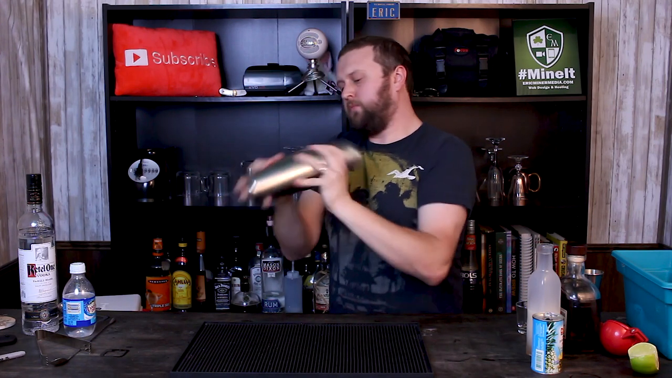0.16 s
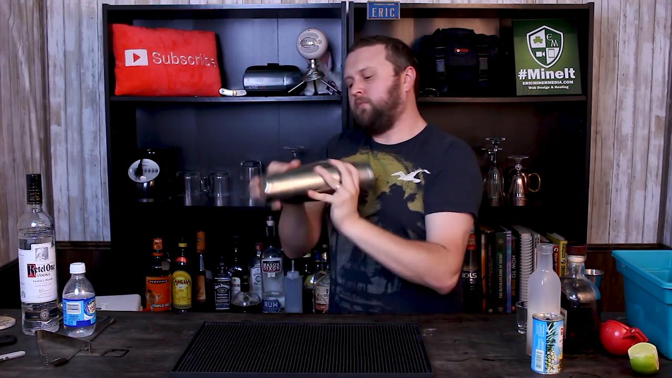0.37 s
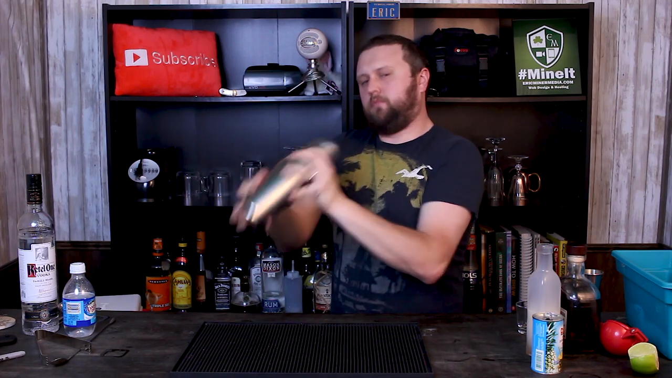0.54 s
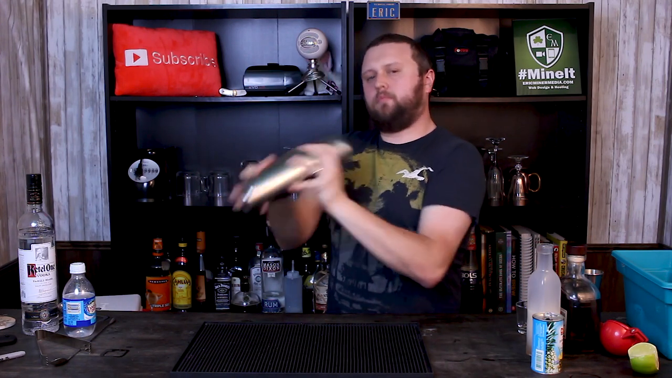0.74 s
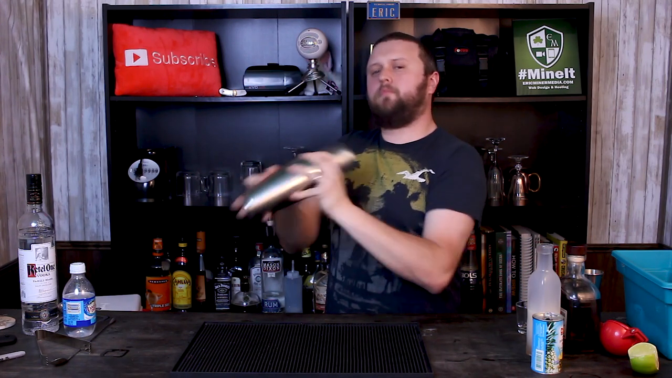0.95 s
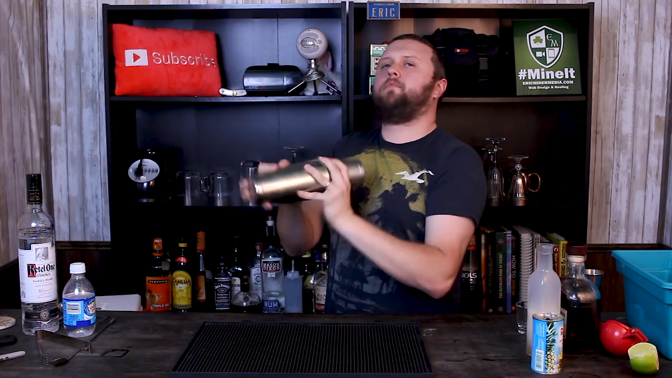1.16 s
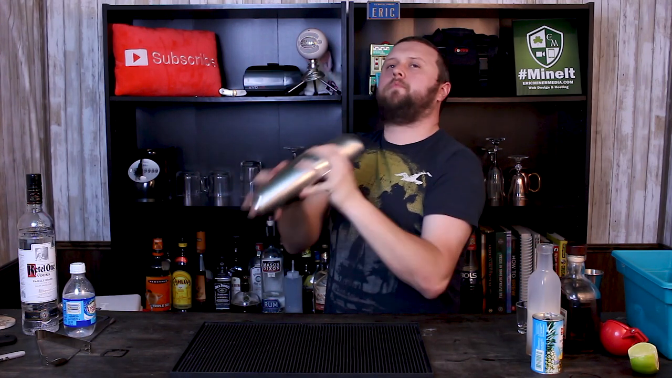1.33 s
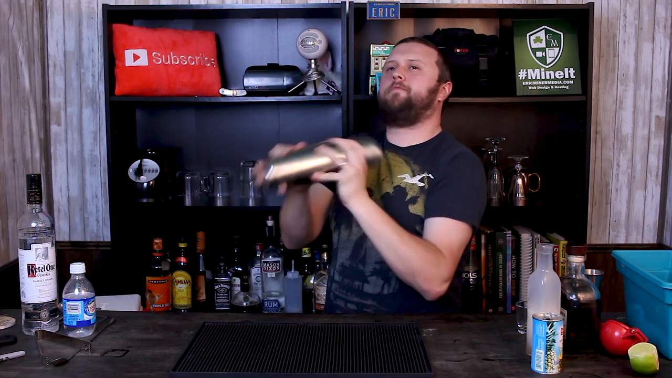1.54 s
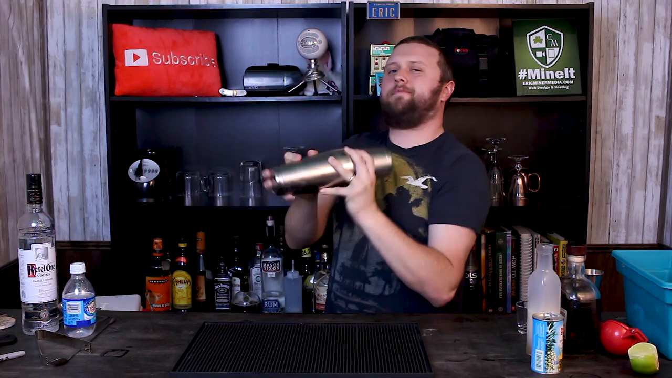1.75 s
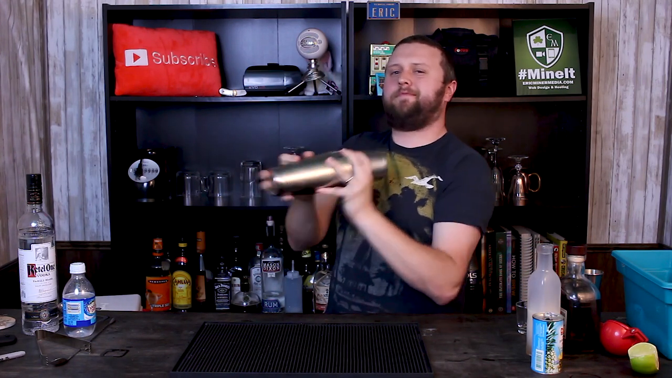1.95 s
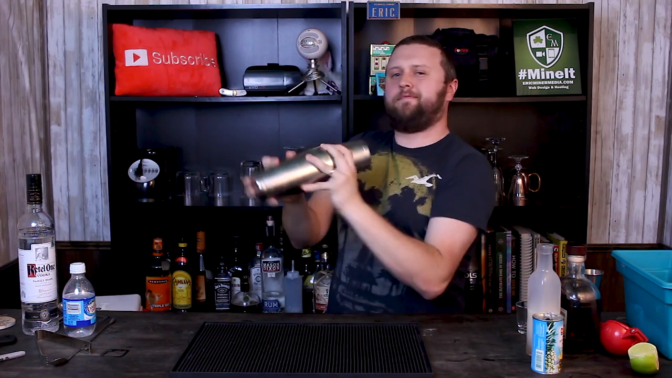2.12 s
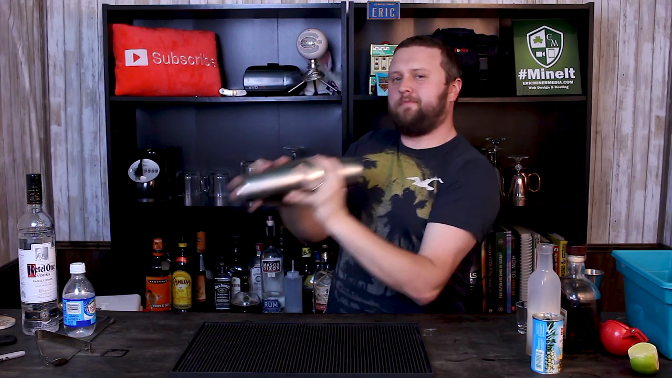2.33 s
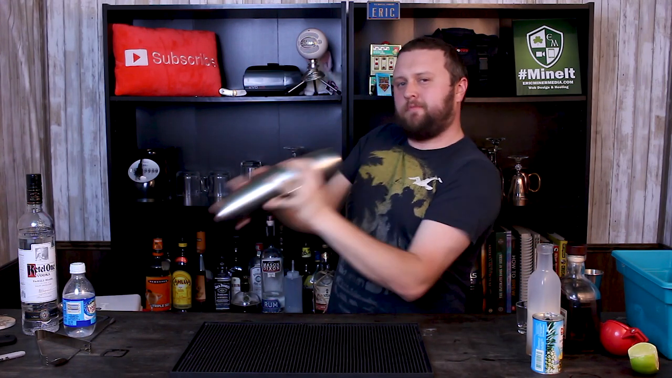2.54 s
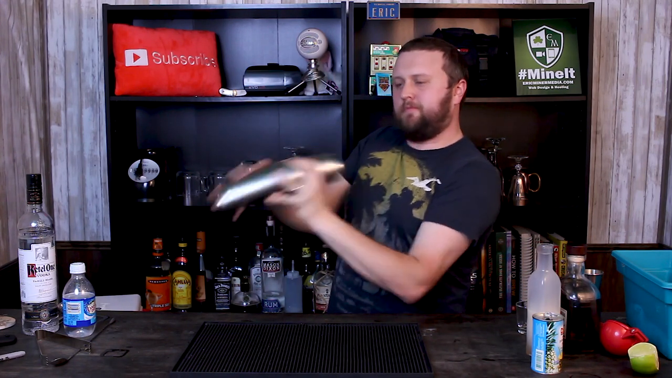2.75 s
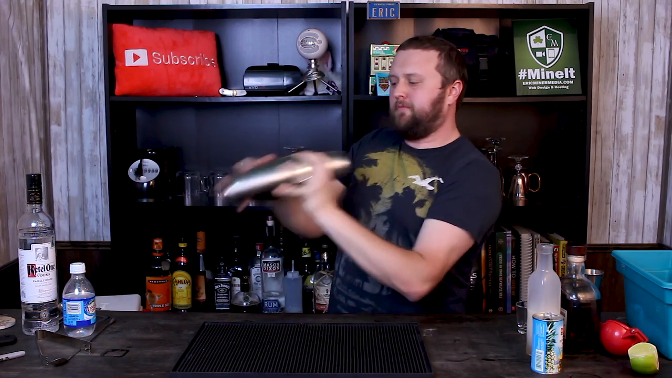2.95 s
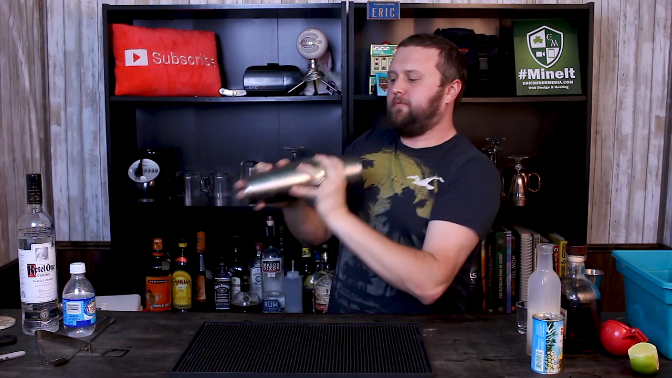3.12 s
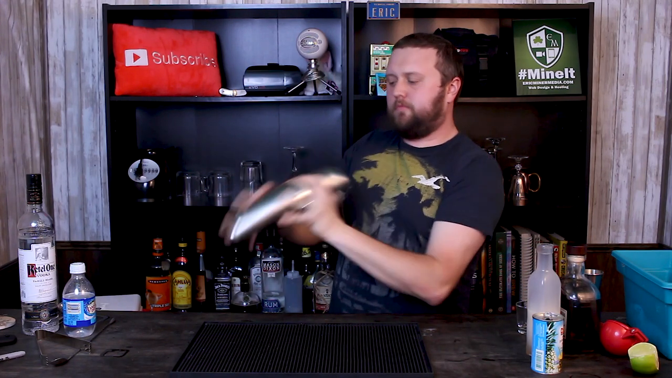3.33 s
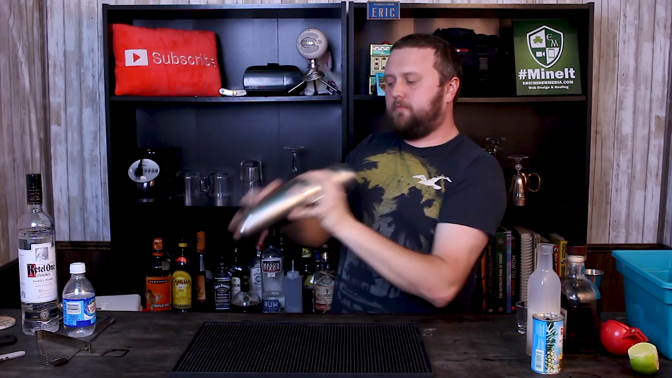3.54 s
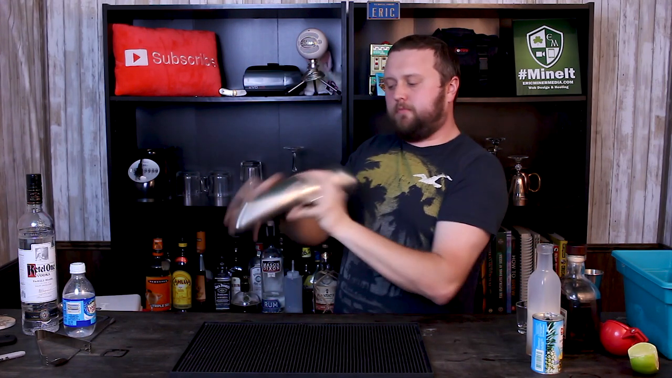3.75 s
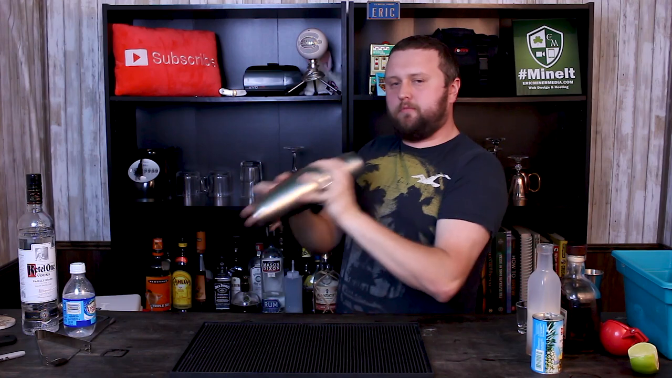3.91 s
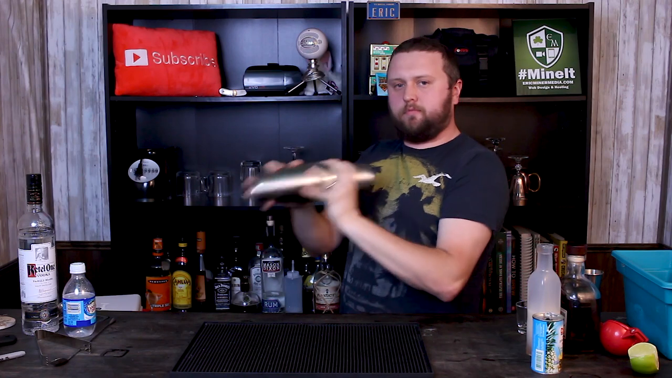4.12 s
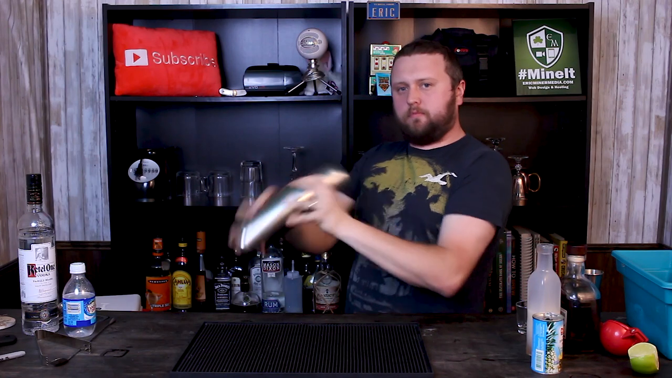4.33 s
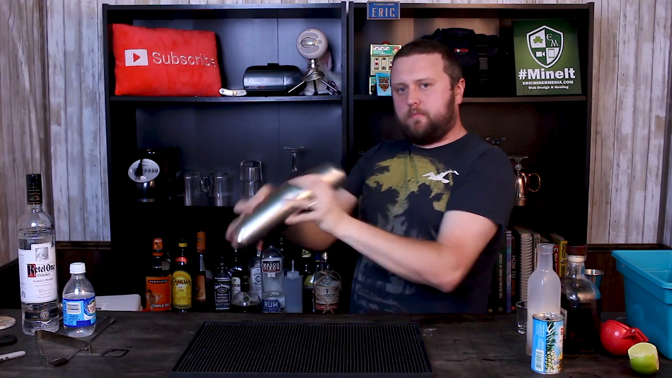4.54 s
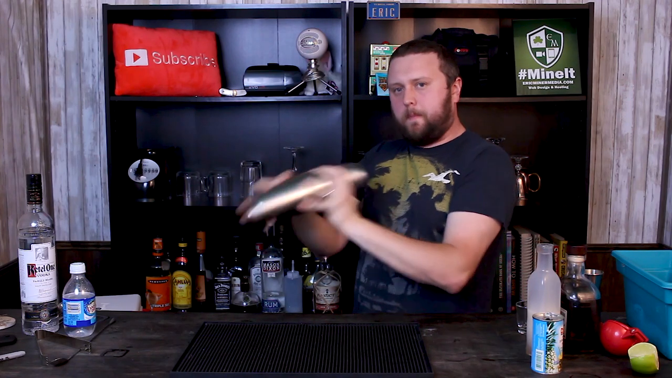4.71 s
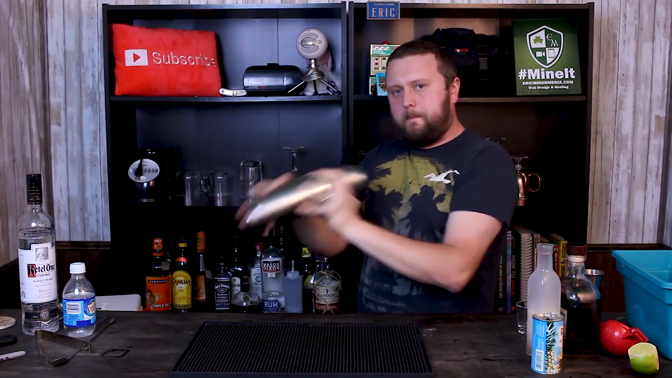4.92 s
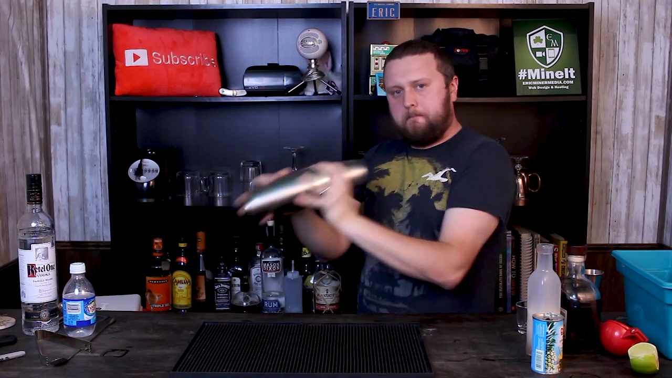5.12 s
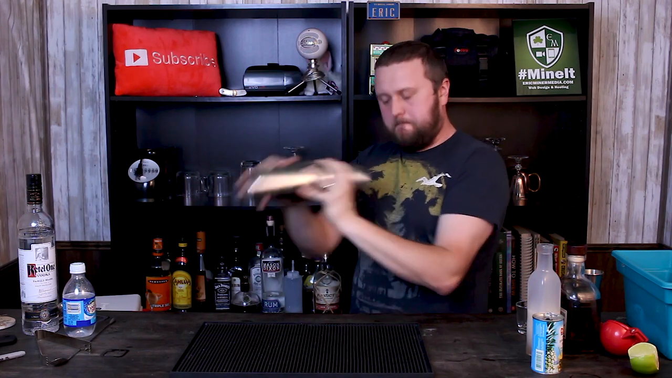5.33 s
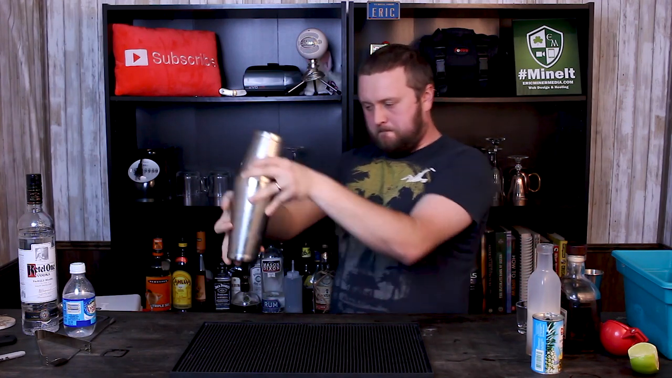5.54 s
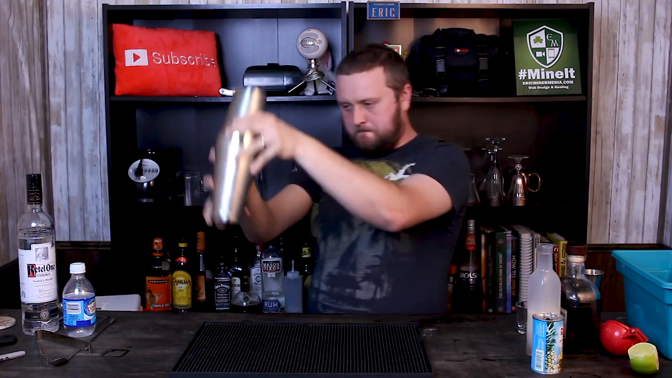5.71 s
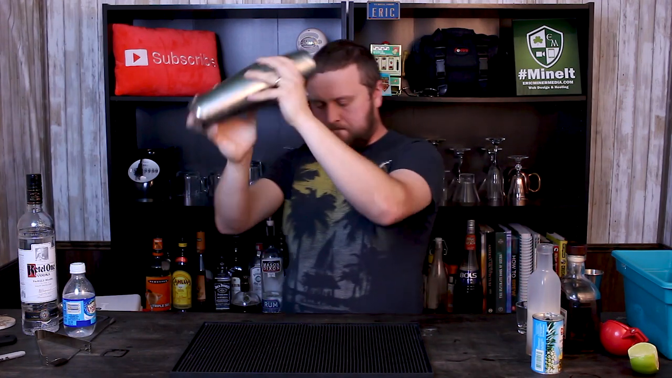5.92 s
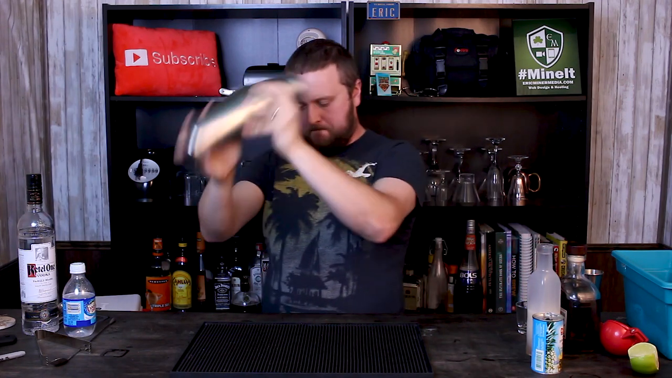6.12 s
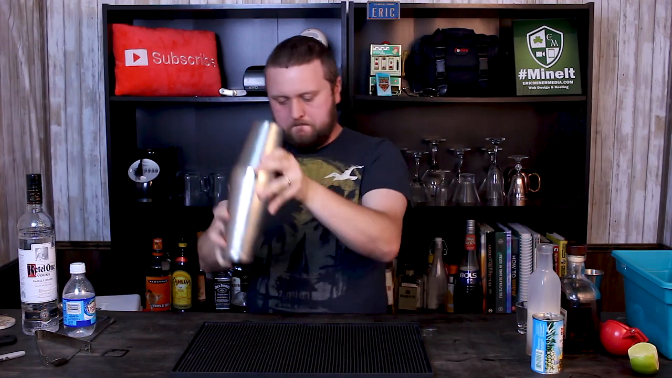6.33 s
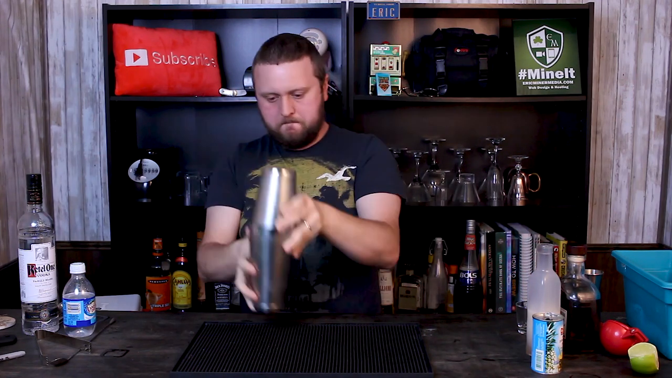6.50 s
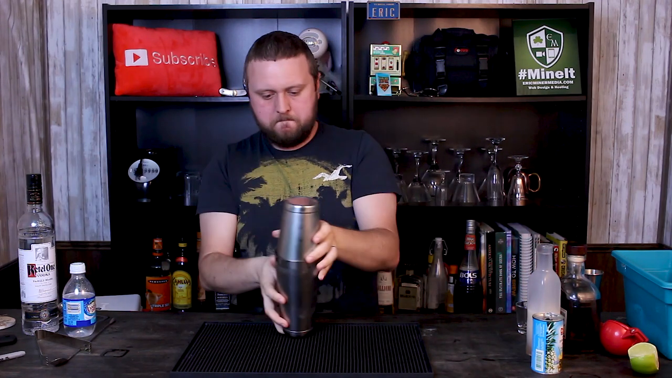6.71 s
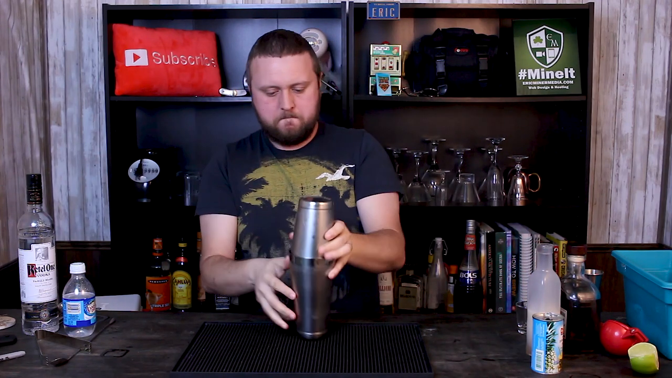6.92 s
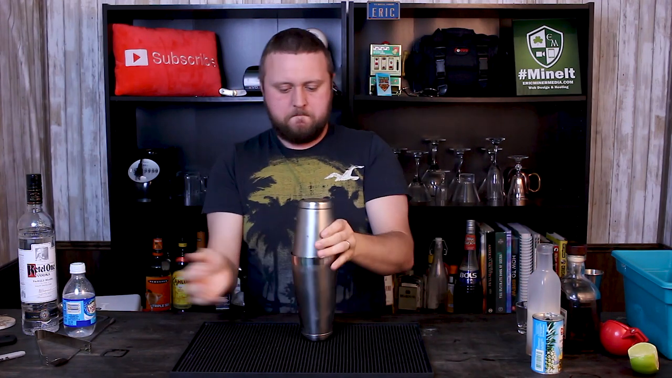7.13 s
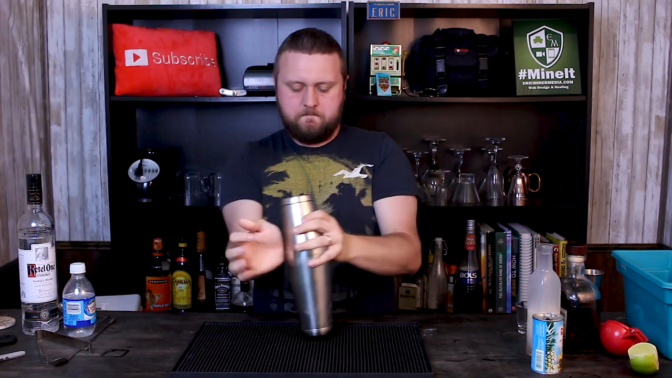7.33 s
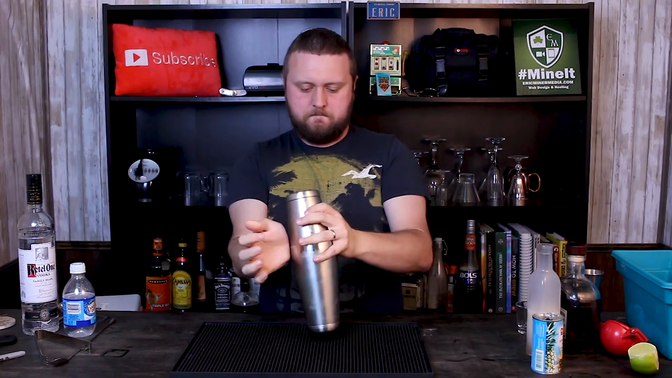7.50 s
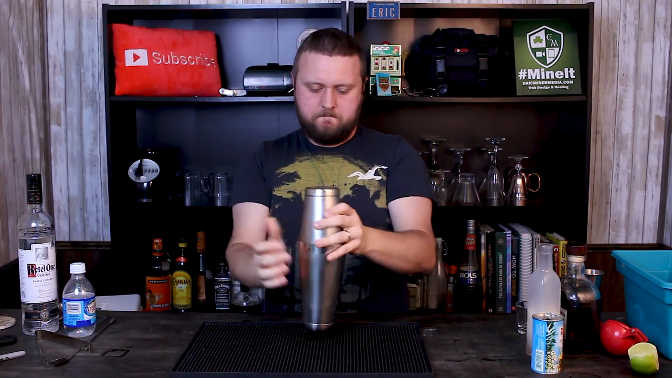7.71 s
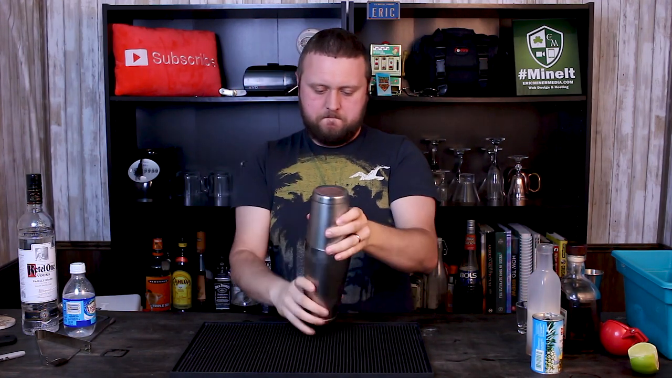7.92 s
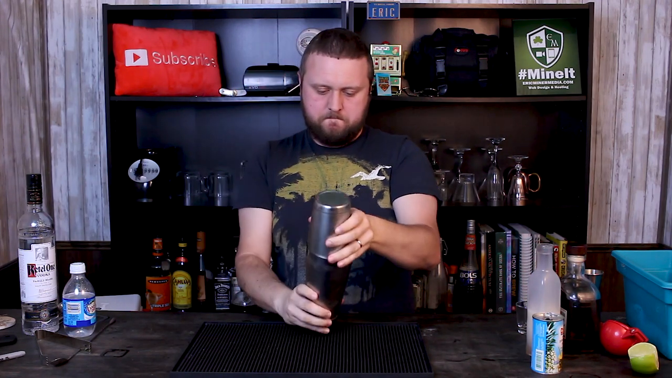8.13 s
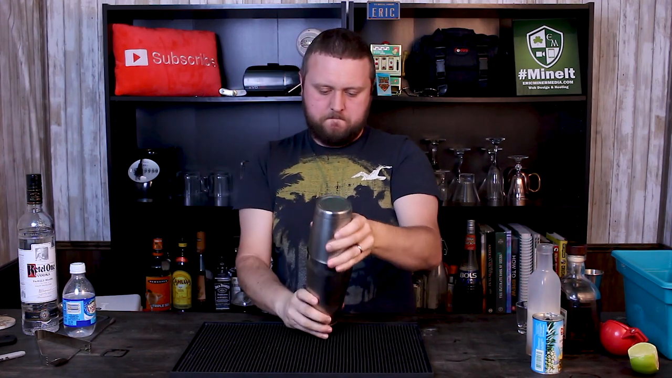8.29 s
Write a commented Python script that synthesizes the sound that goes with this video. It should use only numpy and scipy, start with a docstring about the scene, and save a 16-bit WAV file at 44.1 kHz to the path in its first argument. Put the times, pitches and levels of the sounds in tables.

```python
"""Ice cubes rattle in a steel shaker: dense small clicks under louder crashes at the ends of the tin, whose wall rings.
Then the shaker is turned over, set on a wooden counter and slapped twice while ice clinks in the drink.
Ice is bursts of noise and short pings through the damped modes of the wall; ring, knocks and booms are sines.
A small furnished room answers with decaying noise, over steady room tone; the recorder limits the peaks."""
import sys
import numpy as np
from scipy import signal
from scipy.fft import rfft, irfft, next_fast_len
from scipy.io import wavfile
from scipy.ndimage import uniform_filter1d, minimum_filter1d, map_coordinates

SR = 44100
rng = np.random.default_rng(int(sys.argv[2]) if len(sys.argv) > 2 else 0)


def transcribe(u):
    """Save the signal u as a 16-bit wav file named by the first command-line argument.

    u: samples, shape (n,) or (channels, n), limited to [-1, 1]; the rate is SR.
    q: integer samples, one column per channel.
    """
    v = np.clip(np.atleast_2d(u).T, -1, 1)
    q = np.round(v * 32767).astype(np.int16)
    wavfile.write(sys.argv[1], SR, q)


N = 368676

# Event levels below are relative: each layer adds its own trim in dB.
# Ice arrives at an end of the tin: start_s [s], level_db [dB], t60_s [s]
CRASHES = [(0.004, -6, .2), (0.0717, -18, 0.12), (0.1221, -10, 0.26), (0.198, 1, 0.31), (0.351, -8, 0.2),
           (0.3895, -3, 0.14), (0.469, -6, 0.75), (0.5496, -12.5, 0.057), (0.618, -3.5, 0.16),
           (0.727, -8, 0.11), (0.7961, -4, 0.24), (0.8936, 7, 0.025), (0.921, -25, 0.096),
           (0.9945, -7, 0.087), (1.102, -3, 0.073), (1.202, -4, 0.18), (1.292, -2.5, 0.19),
           (1.3912, -7, 0.13), (1.484, -7, 0.25), (1.6944, -2, 0.13), (1.7384, -8, 0.57),
           (1.8876, -9.5, 0.14), (1.903, -11.5, 0.097), (1.956, -14.5, 0.1), (1.972, -3.5, 0.27),
           (2.0564, -7, 0.84), (2.1287, -2, 0.12), (2.1774, -13, 0.15), (2.259, -9.5, 0.39),
           (2.3166, -0.5, 0.36), (2.4134, -6, 0.1), (2.4389, -8, 0.98), (2.673, -6, 0.29),
           (2.7926, -29, 0.16), (2.838, -4.5, 0.23), (2.8744, -9.5, 0.28), (2.8968, -8, 0.42),
           (2.9554, -6, 0.11), (3.0056, -11, 0.14), (3.2365, -8, 0.41), (3.2967, 2, 0.079), (3.412, -8, 1),
           (3.474, -5, 0.31), (3.6377, -4, 0.046), (3.703, -20.5, 0.066), (3.7224, 3, 0.057),
           (3.8035, -5, 0.22), (3.8776, -4, 0.3), (4.0483, -9.5, 0.22), (4.0966, 1, 0.047),
           (4.205, -4, 0.25), (4.2785, -10, 0.41), (4.3365, -3, 0.056), (4.356, -13.5, 0.083),
           (4.4064, -19, 0.1), (4.6554, -1, 0.039), (4.68, -13, 0.12), (4.791, -10, 0.17),
           (4.8396, 0.5, 0.24), (4.992, -4.5, 0.15), (5.083, -4.5, 0.16), (5.127, -5, 0.15),
           (5.202, -5.5, 0.04), (5.2206, -8, 0.083), (5.251, -3, 0.27), (5.3106, -8.5, 0.11),
           (5.375, -0.5, 0.22), (5.387, -7, 0.14), (5.465, -7, 0.13), (5.579, -3, 0.048), (5.603, -5, 0.18),
           (5.6582, 2, 0.056), (5.7179, -12, 0.24), (6.145, -6.5, 0.25), (6.179, -2, 0.47),
           (6.2352, -4, 0.16), (6.3424, -11, 0.31), (6.43, -10, 0.13), (6.4583, -10.5, 0.13),
           (6.5804, -16, 0.45)]
# The load lands as a stroke turns: start_s [s], knock_db [dB], knock_hz [Hz], thud_db [dB], wall_db [dB], ring_db [dB]
STROKES = [(0.017, -22, 1006, -49, -43, -63), (0.198, -26, 1150, -34, -41, -25),
           (0.401, -27, 1310, -39, -47, -36), (0.619, -23, 804, -36.5, -29, -53),
           (0.795, -20.5, 1030, -34, -27.5, -55), (0.991, -23, 1210, -60.5, -49, -37),
           (1.201, -23, 1186, -35, -28, -29), (1.396, -23, 1314, -49, -43, -40.5),
           (1.606, -26, 938, -35.5, -29.5, -55), (1.77, -18, 1065, -47, -55, -52),
           (1.996, -18.5, 990, -49, -38, -50), (2.14, -26, 802, -34, -36, -77),
           (2.32, -14.5, 773, -30.5, -25, -18.5), (2.535, -26, 1240, -40, -32, -28.5),
           (2.739, -26, 725, -43, -54, -35.5), (2.945, -19.5, 748, -49, -34, -31),
           (3.062, -30, 1140, -60, -34.5, -29.5), (3.294, -16, 1143, -32.5, -29, -24),
           (3.481, -26, 1280, -32.5, -24, -36.5), (3.714, -18, 1180, -42.5, -37, -40),
           (3.897, -25, 759, -39, -39, -41), (4.091, -17, 1310, -30, -27.5, -35),
           (4.239, -41, 1160, -50, -50, -27), (4.299, -25, 1030, -46, -45, -64),
           (4.462, -27, 1030, -42, -28, -44), (4.517, -15.5, 1090, -34.5, -23.5, -28),
           (4.674, -26, 756, -31, -33, -30.5), (4.879, -21, 1080, -36.5, -25, -31),
           (5.095, -20.5, 1270, -38.5, -32, -34.5), (5.302, -18.5, 775, -34, -32, -43),
           (5.457, -27, 1200, -65, -45, -29.5), (5.583, -14, 1186, -52, -32, -46),
           (5.665, -19, 1023, -36, -26, -32.5), (5.72, -15, 1300, -34, -37, -42),
           (6.178, -30, 1330, -52, -41, -36), (6.294, -25, 1046, -44, -33, -32.5),
           (6.359, -24, 1210, -41, -28, -43), (6.419, -27, 1260, -39, -36, -40),
           (6.485, -23.5, 1320, -47, -39, -56), (6.604, -36.5, 1230, -45.5, -38, -51)]
# Loose ice between strokes: time_s [s], bright clicks click_db [dB], ice and drink on the wall wall_db [dB],
# load in the tin load_db [dB]
LOOSE_ICE = [(0, -23.5, -24, -43), (1.6, -20.5, -24.5, -49), (2.0, -22.5, -22.5, -40), (2.3, -37, -29, -55),
             (2.5, -22.5, -25, -45), (3.9, -23, -27, -46), (4.06, -30, -32, -45), (4.3, -21, -28.5, -56),
             (4.9, -22, -27.5, -46), (5.05, -30, -37, -58), (5.15, -22, -24.5, -45.5),
             (5.73, -27.5, -27, -47), (5.87, -41.5, -39, -51), (6.08, -52.5, -43.5, -54.5),
             (6.19, -31, -32, -53), (6.33, -25.5, -30, -44), (6.49, -30, -30.5, -44),
             (6.66, -32.5, -36, -46.5), (6.73, -50, -45, -50.5), (6.99, -53.5, -57, -64),
             (7.08, -45, -37.5, -49.5), (7.33, -66, -55, -86), (7.4, -37, -43, -36), (7.54, -34, -27, -54),
             (7.66, -49, -46.5, -59), (7.76, -48, -45, -57), (7.99, -56, -49.5, -59),
             (8.03, -43.5, -49, -59), (8.36, -58, -64, -71)]
# Fingers and palm land on the tin: start_s [s], crack_db [dB], spray_db [dB], body_db [dB], body_hz [Hz]
SLAPS = [(7.3885, 4, -25, -25.5, 293), (7.3897, -12, -17.5, -41, 524), (7.3964, -13, -21, -23.5, 400),
         (8.02, -29, -21.5, -37, 785)]
# Damped modes of the tin wall: centre_hz [Hz], width_hz [Hz], gain_db [dB]
WALL_MODES = [(380, 146, -3.5), (774, 26, -1), (1017, 16.4, 2.5), (2050, 24, -2.5), (2415, 35, -6),
              (2650, 180, -5.5), (2700, 17, -27), (4400, 24, -6)]
# Broad colour of hard bright clicks: freq_hz [Hz], relative gain_db [dB]
CLICK_COLOUR = [(1760, -28.5), (3000, 0), (3970, -7), (4700, 0), (11800, -1.5), (15100, -11.5), (16000, -8)]
# Broad colour of ice and drink against the wall: freq_hz [Hz], relative gain_db [dB]
WALL_COLOUR = [(530, -47), (900, -14.5), (1190, -5.5), (1660, -4.5), (1730, -4), (1820, 1), (1880, -6.5),
               (2670, -1.5), (4200, -10), (5460, -9.5), (9240, -120)]
# Broad colour of the whole load moving: freq_hz [Hz], relative gain_db [dB]
LOAD_COLOUR = [(35, -59), (60, -41), (314, -15.5), (391, -10.5), (436, -7), (684, -1), (745, 0), (1100, -5),
               (1430, 3), (2420, -120)]


def amp(db):
    """Decibels to gain."""
    return 10 ** (np.asarray(db) / 20)


def unit(x):
    """Scale to rms 1."""
    return x / np.sqrt(np.mean(x ** 2) + 1e-20)


def along(points, hz):
    """Read (Hz, value) points on a log frequency axis."""
    f, v = np.transpose(points)
    return np.interp(np.log(hz + 1), np.log(f + 1), v)


def curves(rows):
    """One value per sample for each column after the time."""
    s, *cols = np.transpose(rows)
    return [np.interp(np.arange(N) / SR, s, c, right=c[-1]) for c in cols]


def filtered(x, response):
    """x through a complex response of frequency, with padding so that tails do not wrap."""
    m = 2 * next_fast_len(N // 2 + SR // 4)
    return irfft(rfft(x, m) * response(np.fft.rfftfreq(m, 1 / SR)), m)[..., :N]


def coloured_noise(colour):
    """Steady noise in a given colour; rms 1."""
    return unit(filtered(rng.standard_normal(N), lambda hz: amp(along(colour, hz))))


def causal(gain):
    """The minimum-phase response of a gain, so that nothing sounds before a blow."""
    cepstrum = irfft(np.log(gain + 1e-6))
    middle = len(cepstrum) // 2
    cepstrum[1:middle] *= 2
    cepstrum[middle + 1:] = 0
    return np.exp(rfft(cepstrum))


def tin(x, colour):
    """x in a broad colour with the resonant wall modes standing on it, at the power of x."""
    def response(hz):
        modes = sum(amp(db) * 1j * hz * width / (centre ** 2 - hz ** 2 + 1j * hz * width)
                    for centre, width, db in WALL_MODES)
        return causal(amp(along(colour, hz))) * (1 + modes)
    return unit(filtered(x, response)) * np.sqrt(np.mean(x ** 2))


def contacts(per_s, spread_db, t60):
    """Random contacts of uneven size, each a short dying burst of noise; rms 1."""
    size = (rng.random(N) < per_s / SR) * amp(spread_db * np.minimum(rng.exponential(size=N), 3))
    envelope = signal.lfilter([1], [1, -amp(-60 / (t60 * SR))], size)
    return unit(envelope * rng.standard_normal(N))


def pings(count, centre_hz, scatter, cycles, spread_db):
    """Chips of all sizes, each ringing a few cycles at its own pitch; rms 1."""
    when, pitch, size = rng.random((count, 3)).T[:, :, None]
    hz = np.minimum(centre_hz * np.exp(scatter * (2 * pitch - 1)), .45 * SR)
    offset = np.arange(256)
    t = offset / SR
    level = amp(-spread_db * np.log(size + 0.044))
    grain = level * np.exp(-t * hz / cycles) * np.sin(2 * np.pi * hz * t)
    at = (when * N).astype(int) + offset
    return unit(np.bincount(at.ravel(), grain.ravel())[:N])


def fades(rows):
    """An envelope that jumps and dies for each (s, dB, t60 s), cut off after half a second at most."""
    out = np.zeros(N + SR)
    for s, db, t60 in rows:
        t = np.arange(int(np.clip(t60, .004, .5) * SR)) / SR
        out[round(s * SR):][:len(t)] += amp(db - 60 * t / max(t60, .004))
    return out[:N]


def swells(rows, rise_s, t60, hold_s=0):
    """An envelope that climbs, holds and then dies for each (s, dB), cut off after half a second."""
    out, t = np.zeros(N + SR), np.arange(SR // 2) / SR
    shape = np.minimum(t / rise_s, 1) * amp(-60 * np.maximum(t - rise_s - hold_s, 0) / t60)
    for s, db in rows:
        out[round(s * SR):][:len(t)] += amp(db) * shape
    return out[:N]


def tones(rows, attack, unsteady):
    """A dying sine with a wandering phase for each (s, dB, Hz, t60 s); attack in s, unsteady in rad per sample."""
    out = np.zeros(N + SR)
    wander = unsteady * np.cumsum(rng.standard_normal(N + SR))
    for s, db, hz, t60 in rows:
        t, at = np.arange(int(min(t60, .5) * SR)) / SR, round(s * SR)
        drift = wander[at:][:len(t)] - wander[at]
        envelope = amp(db - 60 * t / t60) * (1 - np.exp(-t / attack))
        out[at:][:len(t)] += envelope * np.sin(2 * np.pi * hz * t + drift)
    return out[:N]


def room_tone():
    """The quiet room itself: steady coloured noise."""
    # freq_hz [Hz], relative gain_db [dB]
    air_colour = [(15, -83), (25, -42), (911, -4.5), (1100, 13), (1370, 7.5), (11900, -30), (14800, -36),
                  (16000, -57)]
    return amp(-57.5) * coloured_noise(air_colour)


def room(x, size=8192):
    """Each frequency dies at its own speed; the shaker keeps moving, so the fine pattern of echoes keeps changing."""
    # Reverberation time of the furnished room: freq_hz [Hz], t60_s [s]
    room_decay = [(100, 0.37), (500, 0.33), (3000, 0.12), (10000, 0.23)]
    starts = np.arange(-size, N, size)
    # A fresh noise tail for each block of sound
    noise = rng.standard_normal((len(starts), 2 * size))
    hz, t, bands = signal.stft(noise, SR, nperseg=256)
    decay = amp(-60 * t / along(room_decay, hz)[:, None])
    tails = signal.istft(bands * decay, SR, nperseg=256)[1]
    # Overlapping windowed blocks, each with its own echoes, are added back in place
    where = starts[:, None] + size + np.arange(2 * size)
    pieces = np.pad(x, (size, 2 * size))[where] * np.hanning(2 * size)
    wet = signal.fftconvolve(pieces, tails / np.linalg.norm(tails[0]), axes=1)
    where = starts[:, None] + size + np.arange(wet.shape[1])
    echoes = np.bincount(where.ravel(), wet.ravel())[size:]
    return np.pad(echoes, (200, 0))[:N]  # the echoes start 200 samples late


def counter():
    """The wooden top booms at each thud, with a shorter overtone, and rumbles while the base rocks."""
    # Blows on the counter: start_s [s], level_db [dB], pitch_hz [Hz], t60_s [s]
    thuds = [(5.979, -60, 69, 0.12), (6.04, -51, 80.7, 0.11), (6.781, -40.5, 118, 0.11),
             (6.851, -45, 124.5, 0.13), (7.026, -23.5, 102, 0.086), (7.079, -27, 103, 0.035),
             (7.395, -19.5, 114, 0.072), (8.034, -33, 127, 0.051)]
    # The base rocking on the wood: time_s [s], level_db [dB]
    rocking = [(6.7, -84), (6.81, -89), (6.934, -67), (6.982, -56), (7.374, -54), (7.822, -58.5),
               (8.008, -60), (8.36, -67)]
    # Colour of the rumble: freq_hz [Hz], relative gain_db [dB]
    wood_colour = [(40, -28), (100, -7), (140, -14), (230, -22), (400, -39), (900, -120)]
    boom = tones([(s, db + 12, hz, t60) for s, db, hz, t60 in thuds], attack=0.0038, unsteady=0.0048)
    overtone = tones([(s, db - 15, 4.3 * hz, .06) for s, db, hz, _ in thuds], attack=0.0013, unsteady=0.02)
    rocking_db = curves([(0, -120), (6.69, -120), *rocking])[0]
    return boom + overtone + amp(rocking_db) * coloured_noise(wood_colour)


def clinks():
    """Wet ice floating in the drink gives a short unsteady tone and a small cluster of ticks."""
    # start_s [s], level_db [dB], pitch_hz [Hz]
    floating_ice = [(6.5778, -35, 2640), (6.602, -25, 1254), (6.621, -25, 1950), (6.754, -29.5, 1900),
                    (6.854, -32, 1240), (6.8722, -32, 1300), (6.92, -36, 1380), (7.026, -37.5, 1350),
                    (7.0577, -24.5, 3200), (7.13, -28, 1460), (7.1574, -24.5, 1550), (7.1954, -24.5, 1080),
                    (7.253, -35.5, 1095), (7.394, -9, 1600), (7.457, -21, 1800), (7.533, -28, 1870),
                    (7.573, -25.5, 1760), (7.6016, -26, 1740), (7.683, -35, 1010), (7.693, -26, 1050),
                    (7.764, -35, 1105), (7.786, -43, 2800), (7.834, -37, 1110), (7.885, -37, 1810),
                    (7.9345, -32, 1810), (7.9477, -30, 3200), (8.0208, -48, 1090)]
    cluster = fades([(s, db - 13, .09) for s, db, _ in floating_ice])
    ticks = tin(cluster * contacts(per_s=1100, spread_db=-8.0, t60=0.015), WALL_COLOUR)
    tone = tones([(s, db - 4.5, hz, .07) for s, db, hz in floating_ice], attack=0.0013, unsteady=0.052)
    return ticks + tone


def slaps():
    """A bright crack of skin on steel, the jolted ice, and the hollow body of the tin."""
    # Colour of the jolted ice: freq_hz [Hz], relative gain_db [dB]
    palm_colour = [(88, -21), (150, -11), (193, -17), (414, -12), (1140, -14.5), (1760, -16), (2020, -19.5),
                   (2600, -17.5), (11300, -13.5), (16000, -29)]
    snap = fades([(s, db - 11, .012) for s, db, *_ in SLAPS])
    crack = tin(snap * rng.standard_normal(N), CLICK_COLOUR)
    jolt = fades([(s, db, .14) for s, _, db, *_ in SLAPS])
    spray = tin(jolt * contacts(per_s=4200, spread_db=0.0, t60=0.0052), palm_colour)
    body = tones([(s, db + 4.0, hz, .11) for s, _, _, db, hz in SLAPS], attack=0.0012, unsteady=0.027)
    return crack + spray + body


def ring():
    """The least damped mode, a sine with a wandering phase, builds up at each stroke."""
    ring_hz = 1762
    t = np.arange(N) / SR
    wander = map_coordinates(np.cumsum(rng.standard_normal(400)), [t * 30])  # 30 random steps a second
    strokes = swells([(s, db) for s, *_, db in STROKES], rise_s=0.019, t60=0.25, hold_s=0.035)
    # The first slap sets the clear mode going while the ice lies still
    slap = swells([(SLAPS[0][0], -39)], rise_s=0.019, t60=0.76)
    # Between strokes the ring follows the loose ice on the wall
    idle = amp(curves(LOOSE_ICE)[1] - 19.5)
    return np.sqrt(2) * (strokes + slap + idle) * np.sin(2 * np.pi * ring_hz * t + 0.27 * wander)


def knocks():
    """A big cube knocks with a short tone at its own pitch over a dull thump; the whole load sounds the lowest
    mode."""
    # Blows that start a higher mode: start_s [s], level_db [dB], pitch_hz [Hz], t60_s [s]
    clanks = [(4.2383, -23.5, 1960, 0.19), (5.5818, -17.5, 1946, 0.22)]
    blow = fades([(s, knock_db - 11.5, .1) for s, knock_db, *_ in STROKES])
    thump = tin(blow * rng.standard_normal(N), LOAD_COLOUR)
    cube = tones([(s, knock_db - 5, hz, .09) for s, knock_db, hz, *_ in STROKES], attack=0.00027, unsteady=0.035)
    lowest_hz = WALL_MODES[0][0]
    low = tones([(s, thud_db, lowest_hz, .12) for s, _, _, thud_db, _, _ in STROKES],
                attack=0.0055, unsteady=0.032)
    return thump + cube + low + tones(clanks, attack=0.0017, unsteady=.008)


def crashes():
    """Hard single ticks, each with its own colour, and a spray of contacts dying away after each arrival."""
    # Single hard chips on steel: start_s [s], level_db [dB]
    chips = [(0.0128, -12), (0.0723, -10), (0.131, 2), (0.195, -5), (0.2424, -7), (0.391, -7), (0.469, -8),
             (0.508, -8), (0.5504, 9), (0.6494, -14), (0.7254, -6), (0.8929, -10), (0.9198, -12),
             (1.0984, 4), (1.2, -14), (1.289, -10), (1.3912, -12), (1.481, -16), (1.6214, -1), (1.6927, 2),
             (1.7384, -5), (1.7734, -7), (1.9114, -6), (2.0564, -11), (2.1274, -10), (2.2574, -17),
             (2.315, -8), (2.439, -6), (2.4574, 0), (2.4754, -6), (2.6724, -11), (2.7054, -9), (2.836, -11),
             (2.8747, -2), (2.897, -8), (2.956, -12), (3.0266, -4), (3.052, -1), (3.2365, -11),
             (3.265, -10), (3.2934, -11), (3.4116, -9), (3.474, -3), (3.637, -6), (3.703, -13), (3.754, -6),
             (3.8023, 2), (3.8775, -4), (3.917, -8), (4.0482, -8), (4.0936, 12), (4.2064, -6),
             (4.2234, -13), (4.3214, -7), (4.3367, 0), (4.4062, -1), (4.6573, -8), (4.6798, -7),
             (4.7928, -5), (4.84, -3), (4.9927, 4), (5.0104, -7), (5.0814, -14), (5.2021, -7), (5.22, -10),
             (5.252, -2), (5.3747, -7), (5.3944, -11), (5.4254, -8), (5.4364, -10), (5.4643, -8),
             (5.5803, -16), (5.6047, -5), (5.6626, -11), (6.1443, -8), (6.2352, -12), (6.3194, -13),
             (6.4597, 1), (6.4874, -13), (6.5784, -23)]
    ticks = fades([(s, db - 9, .01) for s, db in chips])
    pitch_hz = 4500 * 2 ** (1.6 * rng.random(len(chips)))
    colour = tones([(s, db - 7, hz, .006) for (s, db), hz in zip(chips, pitch_hz)], attack=0.00017, unsteady=0.2)
    spray = fades([(s, db - 16.5, t60) for s, db, t60 in CRASHES])
    fine = spray * contacts(per_s=4000, spread_db=-0.5, t60=0.0033)
    bright = tin(ticks * rng.standard_normal(N) + fine, CLICK_COLOUR)
    coarse = amp(-8) * spray * contacts(per_s=1000, spread_db=5, t60=0.026)
    return bright + colour + tin(coarse, WALL_COLOUR)


def flight(events):
    """Ice in the air: rises from 0 to 1 over the 0.07 s before each event."""
    t = np.arange(N) / SR
    landings = np.append(np.transpose(events)[0], 2 * N / SR)
    wait_s = landings[np.searchsorted(landings, t)] - t
    return np.clip(1 - wait_s / .07, 0, 1)


def loose_ice_gains():
    """Clicks sink before a crash and swell after it; wall and load sink before a stroke lands."""
    click_db, wall_db, load_db = curves(LOOSE_ICE)
    # Each crash stirs up the loose chips
    stir = swells([(s, db - 26) for s, db, _ in CRASHES], rise_s=0.0069, t60=0.24, hold_s=0.022)
    clicking = amp(click_db - 4 - 2.5 * flight(CRASHES)) + stir
    quiet = amp(-6 * flight(STROKES))
    return clicking, amp(wall_db - 4) * quiet, amp(load_db) * quiet


def rattle():
    """Ice chips click on each other, scrape the wall and thud as one load; wall and load swell as a stroke turns."""
    clicking, scraping, lurching = loose_ice_gains()
    surge = swells([(s, wall_db + 1) for s, _, _, _, wall_db, _ in STROKES], rise_s=0.017, t60=0.3)
    thud = swells([(s, thud_db - 1) for s, _, _, thud_db, _, _ in STROKES], rise_s=0.018, t60=0.27)
    chips = 0.33 * pings(count=9000, centre_hz=7470, scatter=0.75, cycles=5.9, spread_db=7.0)
    stray = amp(-9) * contacts(per_s=120, spread_db=5.5, t60=0.0056)  # sharp ticks among the clicks
    bed = contacts(per_s=500, spread_db=-4, t60=0.043)
    clicks = tin(clicking * unit(chips + stray + bed), CLICK_COLOUR)
    wall = tin((scraping + surge) * contacts(per_s=500, spread_db=1.5, t60=0.052), WALL_COLOUR)
    load = tin((lurching + thud) * contacts(per_s=350, spread_db=3, t60=0.074), LOAD_COLOUR)
    return clicks + wall + load


def scene():
    """Room tone, counter and shaker, with the room answering all but the ring."""
    air = room_tone()
    near = counter() + clinks() + slaps() + knocks() + crashes() + rattle()
    return (near + ring() + amp(-8) * room(near) + air)[None]


def record(dry):
    """A fast limiter holds the peaks, deep bass is cut, then the band ends."""
    needed = np.minimum(1, 0.5 / (np.abs(dry) + 1e-9))
    # The gain drops just ahead of each peak and glides back
    gain = uniform_filter1d(minimum_filter1d(needed, size=201), size=101)

    def response(hz):
        low_cut = (1j * hz / (75 + 1j * hz)) ** 2
        return low_cut * (hz < 15900)
    return filtered(dry * gain, response)


dry = scene()
out = record(dry)
transcribe(out)
```